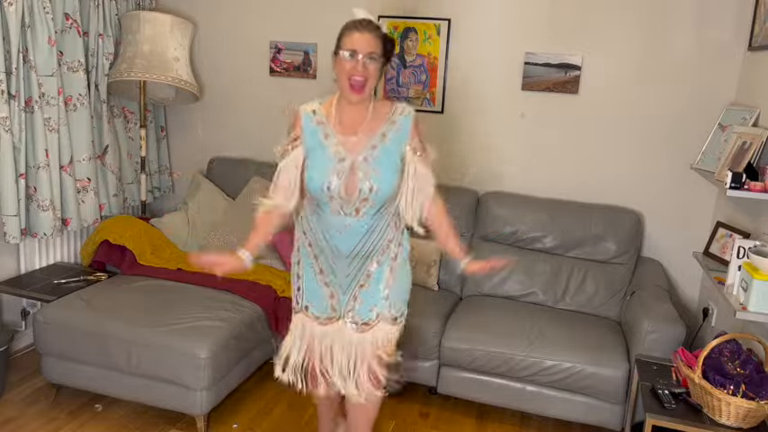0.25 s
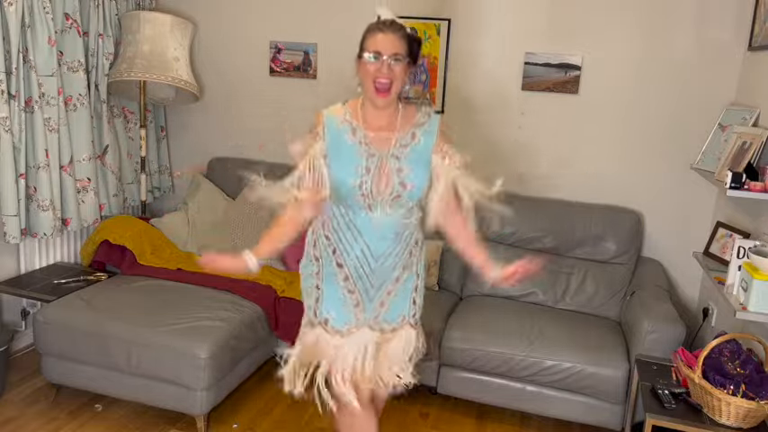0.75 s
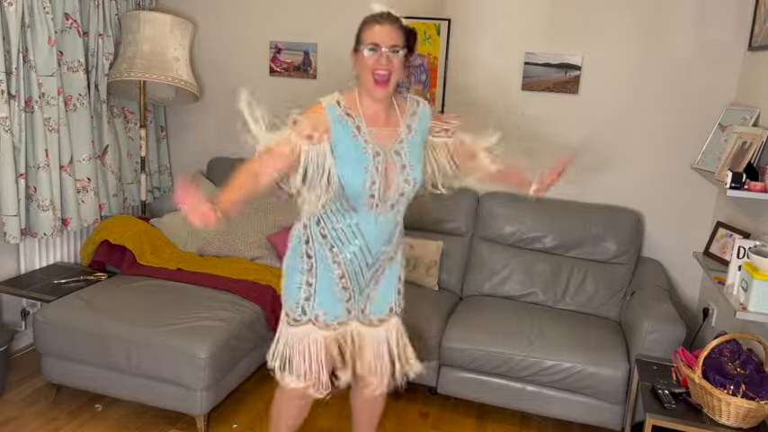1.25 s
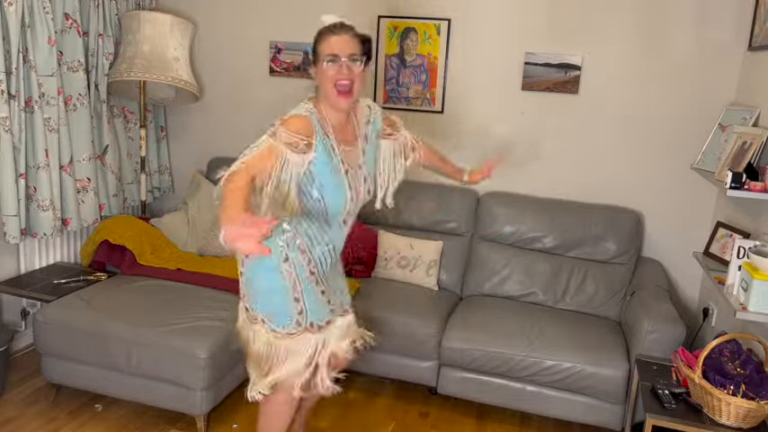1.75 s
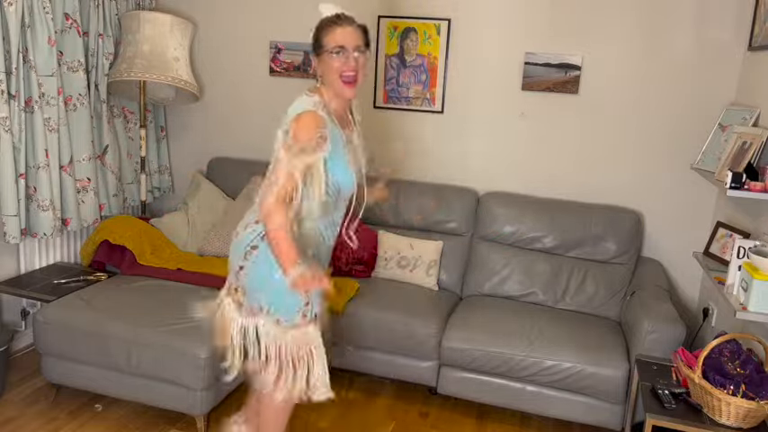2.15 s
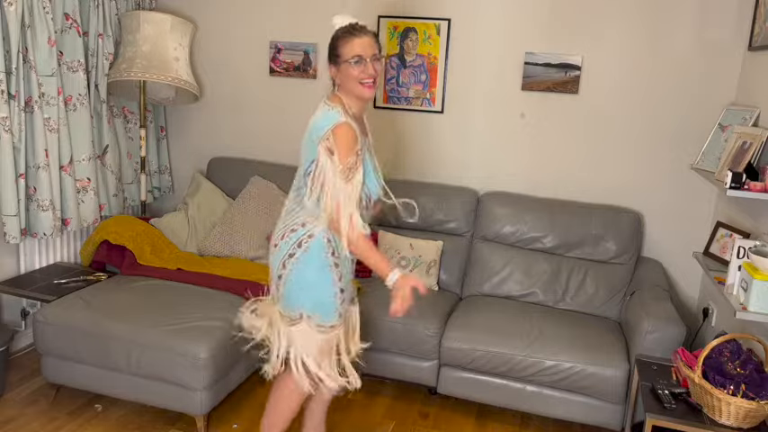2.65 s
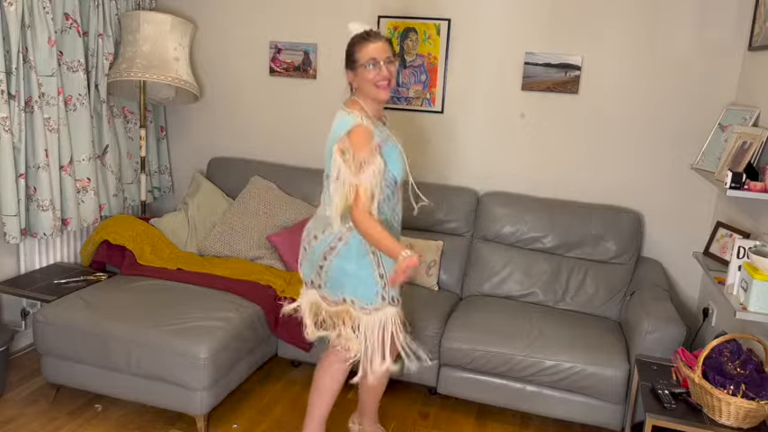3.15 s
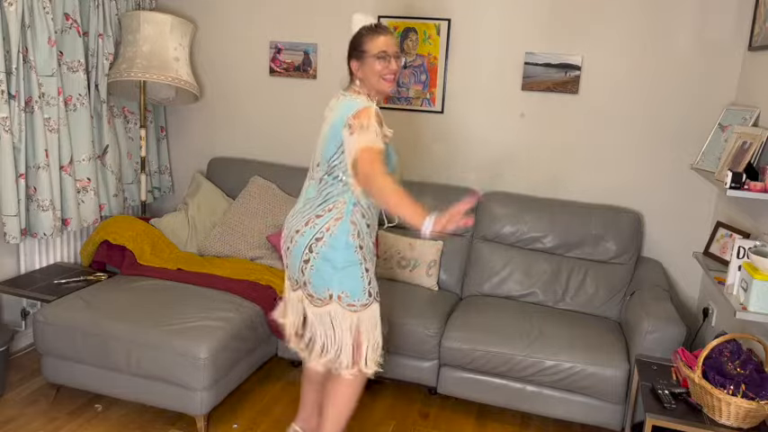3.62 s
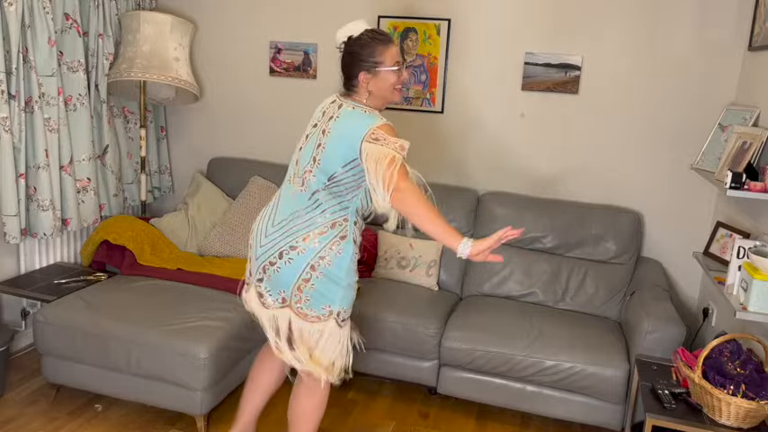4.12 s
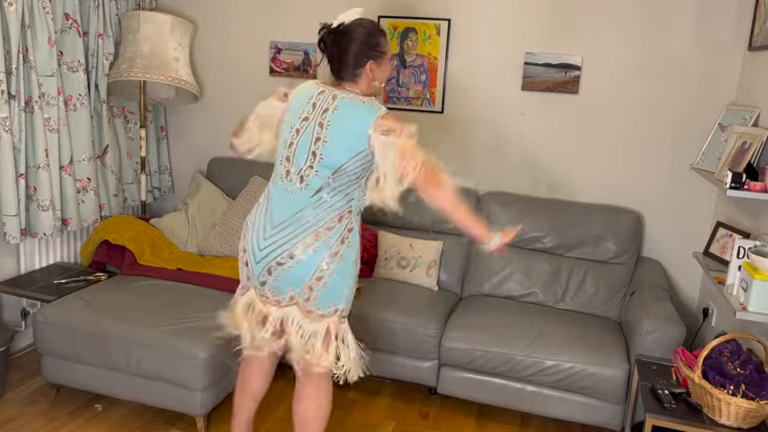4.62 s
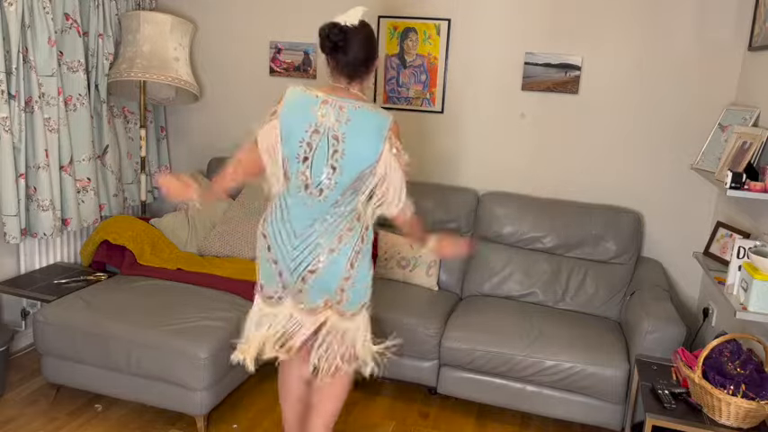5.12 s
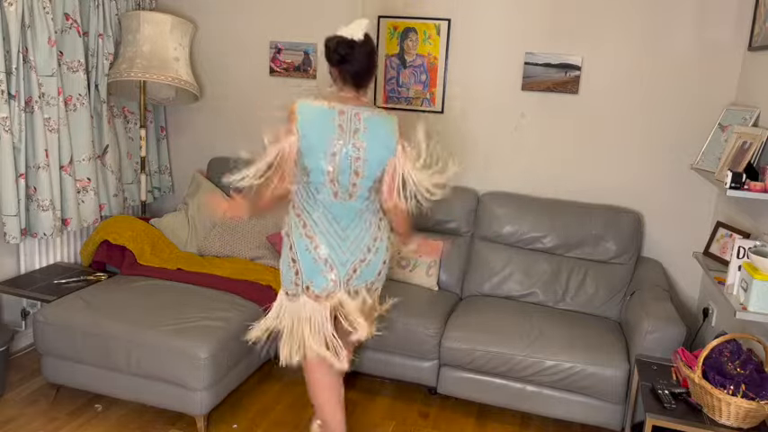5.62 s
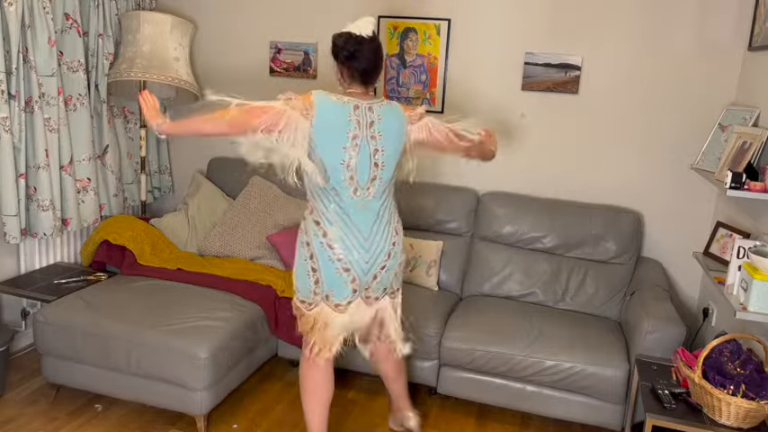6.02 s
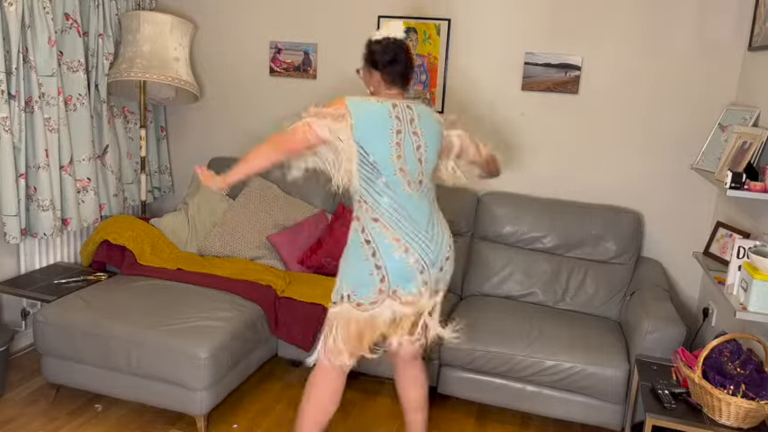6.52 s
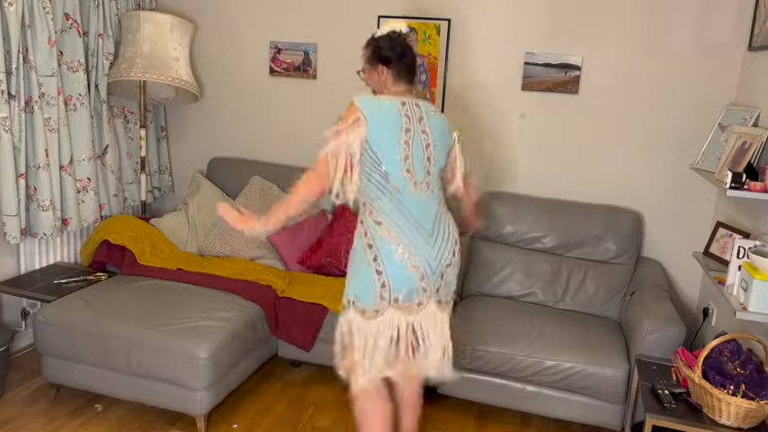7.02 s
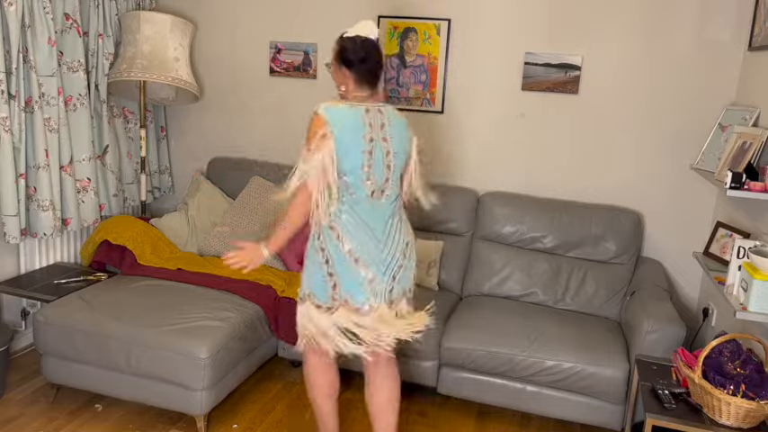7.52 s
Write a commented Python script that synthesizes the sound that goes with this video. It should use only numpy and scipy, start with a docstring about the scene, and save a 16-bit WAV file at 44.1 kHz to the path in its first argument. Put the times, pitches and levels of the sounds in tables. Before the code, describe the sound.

In a small furnished living room, one dancer's shoes thud, knock and clack on wooden boards in irregular clusters, soles rubbing between steps. The sprung floor booms low beneath heavier landings. Fringe swishes continually, beads sizzle finely, and strands slap and snap. A short squeak comes nearly halfway through, and steps crowd closer near the end. A nearby stereo microphone catches a short room ring over faint hush.

```python
"""A dancer in a beaded, fringed dress steps and swivels on a wooden floor in a small living room.
From the start there is a soft hush, soles rub the boards (noise), and shoes thud, knock and clack
(pushed resonances). The fringe swishes and beads sizzle (tiny random hits) as the joists sway and boom
(low noise and fading tones). Soon strands slap (short bright rushes of tiny hits) and hard edges snap
(short noise bursts); nearly halfway through, a sole squeaks (noise in narrow resonances)."""
import sys
import numpy as np
from scipy import signal
from scipy.fft import rfft, irfft, next_fast_len
from scipy.io import wavfile
from scipy.ndimage import uniform_filter1d, map_coordinates

SR = 44100
rng = np.random.default_rng(int(sys.argv[2]) if len(sys.argv) > 2 else 0)


def dump(signal):
    """Clip the signal to [-1, 1] and save it as 16-bit WAV at the path in sys.argv[1]."""
    limited = np.clip(np.atleast_2d(signal).T, -1, 1)
    pcm = np.round(limited * 32767).astype(np.int16)
    wavfile.write(sys.argv[1], SR, pcm)


N = 342657  # length of the scene [samples]
BLOW_TIME = np.arange(round(.3 * SR)) / SR  # the time that one blow lasts [s]


def amp(db):
    """Turn decibels into a gain."""
    return 10 ** (np.asarray(db) / 20)


def unit(x):
    """Scale a sound to rms 1."""
    return x / np.sqrt(np.mean(x ** 2) + 1e-20)


def punch(x, size=1324):
    """Scale a blow to rms 1 over its first samples."""
    return x / np.sqrt(np.mean(x[..., :size] ** 2) + 1e-20)


def along(points, hz):
    """Read a curve of (frequency, value) points on a log frequency axis."""
    f, v = np.transpose(points)
    return np.interp(np.log(hz + 1), np.log(f + 1), v)


def wobble(rate):
    """A smooth random curve with this many random points a second."""
    points = rng.standard_normal(int(N * rate / SR) + 4)
    return map_coordinates(points, [np.arange(N) * rate / SR])


def add(track, s, sound):
    """Mix a sound into a track at time s, or at the very start if s is negative."""
    part = track[:, max(round(s * SR), 0):][:, :sound.shape[-1]]
    part += sound[..., :part.shape[1]]


def filtered(x, response):
    """Change each frequency of a sound by a response function."""
    n = x.shape[-1]
    m = next_fast_len(n + 4096, True)
    return irfft(rfft(x, m) * response(np.fft.rfftfreq(m, 1 / SR)), m)[..., :n]


def coloured(x, spectrum):
    """Give a sound the shape of a spectrum, at rms 1."""
    return unit(filtered(x, lambda hz: amp(along(spectrum, hz))))


# How alike left and right are: (frequency [Hz], coherence [0 to 1])
EAR_LIKENESS = [(50, 1), (150, 0.87), (300, 0.88), (500, 0.62), (750, 0.024), (1500, 0.022), (2000, 0.57),
                (3500, 0.52), (5400, 0.32), (7000, 1), (9000, 1), (14000, 1)]


def spread(pair):
    """Mix two unrelated signals into left and right, as alike as the table says at each frequency."""
    turn = lambda hz: np.arccos(np.clip(along(EAR_LIKENESS, hz), -1, 1)) / 2
    mid, side = filtered(pair, lambda hz: np.array([np.cos(turn(hz)), np.sin(turn(hz))]))
    return np.array([mid + side, mid - side])


def noise(spectrum, size):
    """Stereo noise of rms 1 with a given spectrum."""
    return coloured(spread(rng.standard_normal((2, size))), spectrum)


# How long the room rings: (frequency [Hz], time to fall by 60 dB [s])
ROOM_RING = [(150, 0.42), (500, 0.44), (2000, 0.51), (6000, 0.61), (13000, 0.042)]


def room_tail():
    """The room's answer from one spot: noise that fades at its own speed at each frequency, energy 1."""
    hiss = rng.standard_normal((2, len(BLOW_TIME)))
    hz, t, z = signal.stft(hiss, SR, nperseg=256)
    fade = amp(-60 * t / along(ROOM_RING, hz)[:, None])
    tail = signal.istft(z * fade, SR, nperseg=256)[1][:, :len(BLOW_TIME)]
    tail = spread(tail) * (1 - np.exp(-BLOW_TIME / 0.0018))
    return tail / np.linalg.norm(tail[0])  # the left side sets the scale


def in_room(x, wet_db):
    """The direct sound plus the room's answer to it."""
    answer = signal.fftconvolve(x, room_tail(), axes=1)[:, :x.shape[1]]
    return x + amp(wet_db) * answer


def swell(s, db, rise, fall, hold=0, crest=0):
    """Power of a gesture that climbs to db at s, holds and fades; slopes in dB/s, corner rounded over crest s."""
    t = np.arange(0, N, 64) / SR - s
    away = np.maximum(-t, 0) + np.maximum(t - hold, 0)  # time outside the held part
    slope = np.abs(np.where(t < 0, rise, fall))
    return amp(db - (np.hypot(away, crest) - crest) * slope) ** 2


def envelope(swells, rest_db=-120):
    """The gain, sample by sample, of overlapping swells on top of a resting level."""
    gain = np.sqrt(sum(swells) + amp(rest_db) ** 2)
    return np.interp(np.arange(N), np.linspace(0, N, len(gain)), gain)


# Colour of the quiet room: (frequency [Hz], relative level per Hz [dB])
HUSH_COLOUR = [(20, -16), (50, 8), (110, -9.5), (300, -15), (700, -32), (1500, -10.5), (3000, -28.5),
               (7000, -23.5), (13500, -59)]


def hush():
    """The quiet of the room is steady, coloured noise."""
    return amp(-62.5) * noise(HUSH_COLOUR, N)


# A sole swivels on the boards: (start time [s], length [s], level before the wobble [dB])
SWIVEL_TIMES = [(0.0, 0.15, -49.5), (0.247, 0.18, -53.5), (0.63, .1, -57.5), (0.717, 0.091, -46.5),
                (1.34, 0.39, -55.5), (2.026, 0.13, -56), (2.37, 0.064, -58.5), (2.54, 0.4, -60),
                (3.286, 0.22, -52), (3.708, 0.077, -53.5), (4.315, 0.15, -54.5), (5.443, 0.32, -59),
                (6.197, 0.4, -55.5), (7.18, 0.78, -58.5)]
# Colour of the rubbing: (frequency [Hz], relative level per Hz [dB])
RUB_COLOUR = [(60, 5.5), (150, -1), (260, -2.5), (450, -6.5), (700, -12), (1200, -10.5), (8000, -43)]
SWIVEL_RISE_DB_PER_S, SWIVEL_FALL_DB_PER_S = 400, 168
SOLES_REST_DB = -76  # faint rubbing between swivels


def shuffle():
    """Soles rub and rock on the boards: noise with a wobbling level for as long as a foot swivels."""
    rubs = [swell(s, db, SWIVEL_RISE_DB_PER_S, SWIVEL_FALL_DB_PER_S, hold=length)
            for s, length, db in SWIVEL_TIMES]
    rocking = amp(5.0 * wobble(14))
    return envelope(rubs, SOLES_REST_DB) * rocking * noise(RUB_COLOUR, N)


def causal(x, spectrum):
    """Give a sound a spectrum that rings only after each push, never before it."""
    size = 2048
    log_gain = np.log(amp(along(spectrum, np.fft.rfftfreq(size, 1 / SR))))
    # folding the cepstrum forwards gives the minimum-phase ring
    fold = np.r_[1, np.full(size // 2 - 1, 2), np.zeros(size // 2)]
    ring = irfft(np.exp(rfft(irfft(log_gain) * fold)))
    return signal.fftconvolve(x, ring[None], axes=1)[:, :x.shape[1]]


def contact(spectrum, t60, attack, solid_db):
    """A shoe meets the wood: one solid push, then many close resonances that die together."""
    fade = amp(-60 * BLOW_TIME / t60) * (1 - np.exp(-BLOW_TIME / attack))
    pair = unit(rng.standard_normal((2, len(BLOW_TIME))) * fade)
    pair[0, 0] += amp(solid_db) * np.sqrt(len(BLOW_TIME))
    return punch(causal(spread(pair), spectrum))


def bending(x, late_cycles):
    """Bending waves in the boards: low notes travel slowest, so a knock sweeps downwards."""
    return filtered(x, lambda hz: np.exp(-2j * np.pi * late_cycles * np.log(hz + 60)))


# Ringing modes of the floor: (frequency before detuning [Hz], relative level [dB], time to fall by 60 dB [s])
BOARD_MODES = [(157.4, -6.5, 0.47), (212.7, -5, 0.375), (252.8, -4.5, 0.42), (296.2, -3, 0.18),
               (424, -11, 0.57), (466, -12, 0.15), (613, -11, 0.28), (861, -2.5, 0.087), (1098, 3.5, 0.077),
               (1307, 3, 0.03)]
SPOT_DB, SPOT_OCTAVES = 5.5, 0.043  # a mode near the spot's pitch rings louder; how near it must be


def boards(blow_db, spot_hz, roll_s):
    """The floor's modes ring as fading sines, each as hard as the blow in its range; each spot favours its own."""
    hz, mode_db, t60 = np.transpose(BOARD_MODES)[:, :, None]
    strength, detune, side = rng.standard_normal((3, len(BOARD_MODES), 1))
    # the thud drives the lowest modes, the knock the middle ones, the clack the highest
    push_db = np.interp(hz, [260, 420, 600, 850], np.repeat(blow_db, [1, 2, 1]))
    level_db = mode_db + push_db + 2 * strength
    level_db += SPOT_DB * np.exp(-(np.log2(hz / spot_hz) / SPOT_OCTAVES) ** 2)
    tones = np.sin(2 * np.pi * hz * (1 + 0.021 * detune) * BLOW_TIME)
    modes = np.sign(side) * amp(level_db - 60 * BLOW_TIME / t60) * tones
    return modes.sum(axis=0) * (1 - np.exp(-BLOW_TIME / (0.0016 + roll_s)))


# Shoe contacts, levels before trims: (time [s], thud level [dB], knock level [dB], clack level [dB],
# time to roll the foot down [s], pitch of the spot [Hz])
SHOE_STEPS = [(0.008, -50, -63, -53.5, 0.0026, 146), (0.607, -54, -76, -84, 0.0038, 208),
              (0.71, -42.5, -49.5, -74, 0.0024, 230), (0.774, -42, -49, -80, 0.0045, 140),
              (0.835, -40, -41, -47, 0.0018, 260), (0.853, -43, -46, -51, 0.0014, 129),
              (0.921, -43.5, -53, -73, 0.0035, 212), (1.263, -48.5, -63, -38.5, 0.0011, 249),
              (1.28, -43, -53, -55, 0.0034, 202), (1.897, -52, -46, -55, 0.0016, 257),
              (1.963, -42, -36.5, -45.5, 0.001, 210), (2.004, -51, -45, -53, 0.0015, 302),
              (2.489, -48, -43.5, -50, 0.001, 315), (2.522, -50, -51, -52, 0.0049, 141),
              (3.098, -42, -42.5, -51, 0.0041, 257), (3.12, -42.5, -50, -66, 0.0017, 147),
              (3.208, -41.5, -42, -51, 0.0016, 233), (3.927, -49, -54, -80, 0.0022, 154),
              (4.288, -46.5, -51, -52, 0.002, 212), (4.357, -45.5, -41.5, -49.5, 0.0011, 222),
              (4.438, -46.5, -53, -64, 0.005, 213), (4.843, -70, -78, -55.5, 0.0059, 161.0),
              (4.944, -40.5, -46.5, -57, 0.0029, 249), (5.091, -47, -40.5, -55.5, 0.00086, 266),
              (5.111, -53, -63, -47.5, 0.002, 336), (5.345, -52.5, -44.5, -54.5, 0.0016, 214),
              (5.532, -47, -48, -63, 0.0056, 435), (6.299, -52, -75, -57, 0.0013, 132),
              (6.405, -49.5, -49.5, -64, 0.0096, 238), (6.513, -46, -56, -66, 0.0042, 199),
              (6.668, -55.5, -57, -50.5, 0.0015, 250), (6.764, -44, -42.5, -51.5, 0.0009, 169),
              (6.787, -43, -61, -68, 0.0027, 283), (6.858, -44.5, -48, -59, 0.003, 324),
              (6.897, -38.5, -53, -72, 0.0033, 182), (6.981, -44, -52, -52.5, 0.004, 310),
              (7.03, -44, -67, -72, 0.0037, 193), (7.148, -49, -50, -65, 0.0065, 180),
              (7.308, -53, -62, -50.5, 0.00091, 151.0), (7.355, -45.5, -56, -53, 0.024, 211),
              (7.45, -44, -53.5, -59, 0.008, 133), (7.59, -45.5, -45, -56.5, 0.0095, 144)]
# Deep thud of the boards: (multiple of the spot's pitch, relative level per Hz [dB])
THUD_COLOUR = [(.35, -6), (.65, -13), (1, 0.5), (1.4, -10), (2.1, -19), (3.6, -31), (18, -72)]
# Hollow knock: (frequency [Hz], relative level per Hz [dB])
KNOCK_COLOUR = [(150, -7), (280, 2), (380, 8.5), (480, 3), (620, 0), (850, -2.5), (1500, -46.5),
                (8000, -73)]
# Clack of the sole: (frequency before the shift for hardness [Hz], relative level per Hz [dB])
CLACK_COLOUR = [(300, -36.5), (600, -4.5), (850, 2), (1300, 0.5), (2000, -9), (4000, -32), (8000, -50),
                (16000, -55)]
ROLL_STRETCH = 5.2  # seconds of extra ringing per second of roll
SOLID_DB, SOFTEN_DB_PER_S = 1, 1200  # first push against its ringing; loss per second of roll


def steps():
    """Each shoe thuds, knocks and clacks and rings the boards; a rolled foot blurs them all."""
    out = np.zeros((2, N))
    for s, thud_db, knock_db, clack_db, roll_s, spot_hz in SHOE_STEPS:
        bright = 2 ** ((clack_db + 51.5) * 0.073)  # a harder blow is a shorter contact
        linger = ROLL_STRETCH * roll_s
        solid_db = SOLID_DB - SOFTEN_DB_PER_S * roll_s
        thud_colour = np.multiply(THUD_COLOUR, [spot_hz, 1])
        clack_colour = np.multiply(CLACK_COLOUR, [bright, 1])
        thud = contact(thud_colour, t60=0.06 + linger, attack=roll_s, solid_db=solid_db)
        knock = contact(KNOCK_COLOUR, t60=0.084 + linger, attack=0.3 * roll_s, solid_db=solid_db)
        clack = contact(clack_colour, t60=0.059 + linger, attack=0.85 * roll_s, solid_db=solid_db)
        blow = amp(thud_db - 2.0) * punch(in_room(thud, wet_db=1.5))
        blow += amp(knock_db - 2.5) * punch(in_room(knock, wet_db=1.0))
        blow += amp(clack_db - 4.0) * punch(in_room(clack, wet_db=1.5))
        blow += amp(0.6) * boards([thud_db, knock_db, clack_db], spot_hz, roll_s)
        add(out, s, bending(blow, late_cycles=0.902))
    return out


def wandering_echoes(x):
    """The room answers from a new spot four times a second as she travels across the floor."""
    hop = SR // 4
    padded = np.pad(x, ((0, 0), (hop, 2 * hop)))
    out = np.zeros_like(padded)
    for i in range(0, N + hop, hop):
        part = padded[:, i:i + 2 * hop] * signal.windows.cosine(2 * hop)
        add(out, i / SR, signal.fftconvolve(part, room_tail(), axes=1))
    return out[:, hop:hop + N]


CLUMPS_PER_S = 420  # strands land in small uneven clumps


def patter(spectrum, rate, scatter_db, clump_db, patchy_db, wet_db):
    """Countless tiny collisions of uneven size, heard in the room; their colour shifts as the cloth moves."""
    happens = rng.random((2, N)) < rate / SR
    size = rng.standard_normal((2, N)) * amp(scatter_db * rng.standard_normal((2, N)))
    hits = happens * size * amp(clump_db * wobble(CLUMPS_PER_S))
    z = signal.stft(hits, nperseg=1024)[2]
    # random patches, smoothed over frequency and then over time
    field = uniform_filter1d(rng.standard_normal(z.shape[1:]), size=4, axis=0)
    field = uniform_filter1d(field, size=3, axis=1)
    patchy = signal.istft(z * amp(patchy_db * unit(field)), nperseg=1024)[1][:, :N]
    heard = patchy + amp(wet_db) * wandering_echoes(patchy)
    return coloured(spread(heard), spectrum)


# The fringe is thrown, levels before trims: (time of the crest [s], swish level [dB], bead sizzle level [dB],
# rise over 20 dB [s], fall over 20 dB [s])
FRINGE_SWINGS = [(0.013, -45, -61, .046, 0.14), (0.14, -49.5, -66.5, 0.086, 0.14),
                 (0.334, -48, -57.5, 0.12, 0.14), (0.635, -54.5, -64, 0.03, .25),
                 (0.741, -47, -63, 0.065, 0.093), (0.99, -50.5, -63.5, 0.26, 0.22),
                 (1.17, -80, -67, 0.036, 0.098), (1.292, -41.5, -56, 0.021, 0.15),
                 (1.624, -43.5, -59.5, 0.14, 0.13), (1.957, -50.5, -64.5, 0.097, 0.15),
                 (2.2, -48.5, -66, 0.13, 0.1), (2.526, -54, -89, 0.13, 0.13), (2.71, -51, -62, 0.053, 0.21),
                 (2.8, -54.5, -60.5, 0.12, 0.09), (2.94, -69, -66.5, 0.029, 0.15),
                 (3.132, -45.5, -58.5, 0.049, 0.16), (3.37, -46, -53.5, 0.037, 0.16),
                 (3.428, -47, -61.5, 0.029, 0.15), (3.715, -50.5, -65, 0.045, 0.14),
                 (4.019, -49, -62.5, 0.16, 0.14), (4.33, -54.5, -77, 0.18, 0.089),
                 (4.585, -47.5, -63.5, 0.077, 0.16), (4.967, -45, -58, 0.11, 0.16),
                 (5.138, -51.5, -67, 0.069, 0.14), (5.229, -78, -65, 0.13, 0.1),
                 (5.474, -56, -69, 0.34, 0.21), (5.594, -44.5, -60, 0.14, .1),
                 (5.808, -47, -58, 0.074, 0.16), (5.88, -47.5, -81, 0.089, 0.11),
                 (6.214, -47, -62.5, 0.24, 0.16), (6.41, -52.5, -65, 0.067, .15),
                 (6.47, -52, -63.5, 0.074, 0.14), (6.798, -49.5, -66.5, 0.16, 0.14),
                 (7.085, -48, -62, 0.18, 0.14), (7.384, -51, -58.5, 0.11, 0.22),
                 (7.644, -52, -65.5, 0.15, 0.3)]
# Beads and hard shoe edges snap, levels before trims: (time [s], treble level [dB], bite level [dB],
# level of the rattle that follows [dB]); the dress plays the rattle, clicks() the rest
SNAPS = [(0.2224, -55, -75, -77), (1.237, -56, -76, -73), (1.2623, -52.5, -40, -66),
         (1.467, -53.5, -52, -57), (2.1345, -59, -56, -54), (2.4309, -58, -50.5, -53.5),
         (2.989, -68, -57, -54.5), (3.102, -65, -60, -53.5), (3.6616, -68, -52, -57.5),
         (4.252, -88, -61, -55), (4.467, -58, -61, -54), (4.886, -54, -72, -82), (5.346, -69, -55, -67),
         (5.652, -48, -39, -51.5), (6.035, -80, -62.5, -73), (6.064, -66, -61, -56.5),
         (6.668, -95, -50.5, -57), (7.303, -92, -54, -61.5)]
# Colour of the swishing strands: (frequency [Hz], relative level per Hz [dB])
SWISH_COLOUR = [(120, 3.5), (300, -2), (700, 0), (1200, 3.5), (1800, -1), (2800, 0), (4300, -0.4),
                (5500, -7), (7200, -7), (10000, -27), (16000, -64)]
# Colour of the sizzling beads: (frequency [Hz], relative level per Hz [dB])
SIZZLE_COLOUR = [(2000, -40), (5000, -2), (7500, -13), (9500, 6), (12000, 2), (14100, 4), (14600, -26),
                 (15600, -43)]
SWISH_REST_DB, SIZZLE_REST_DB = -99, -75.5  # the dress is never quite still; before trims
JOLT_FALL_DB_PER_S, JOLT_SIZZLE_DB = 48.5, -10.5  # rattle's fade; its sizzle against its swish
CREST_S = 0.019  # roundness of a swing's crest


def dress():
    """Swings throw the fringe against the dress and snaps jolt it: strands swish and beads sizzle."""
    jolts = sum(swell(s, db, rise=3400, fall=JOLT_FALL_DB_PER_S) for s, _, _, db in SNAPS)
    strands, beads = [jolts], [jolts * amp(JOLT_SIZZLE_DB) ** 2]
    for s, swish_db, sizzle_db, rise_s, fall_s in FRINGE_SWINGS:
        swing = swell(s, 0, 20 / rise_s, 20 / fall_s, crest=CREST_S)
        strands.append(amp(swish_db) ** 2 * swing)
        beads.append(amp(sizzle_db) ** 2 * swing)
    swish = patter(SWISH_COLOUR, rate=9000, scatter_db=0.5, clump_db=1.0, patchy_db=2.5, wet_db=-6.0)
    swish *= envelope(strands, SWISH_REST_DB) * amp(0.91 + 1.0 * wobble(45))
    sizzle = patter(SIZZLE_COLOUR, rate=16000, scatter_db=2.5, clump_db=0.5, patchy_db=3.0, wet_db=-2.5)
    sizzle *= envelope(beads, SIZZLE_REST_DB) * amp(5.0)
    return swish + sizzle


# The body's weight lands on the floor: (nominal time of the crest [s], level before trims [dB], pitch [Hz],
# time to fall by 60 dB [s])
WEIGHT_LANDINGS = [(0.08, -47, 53.1, 0.78), (0.334, -43.5, 53.4, 0.12), (0.853, -30, 46.7, 0.39),
                   (0.949, -44, 72, 0.14), (1.081, -46.5, 50, 0.48), (1.342, -40.5, 49.5, 0.11),
                   (1.558, -44, 46.7, 0.97), (2.023, -46.5, 67.4, 0.32), (2.571, -52, 66, 0.51),
                   (3.212, -29, 53, 0.19), (4.451, -51, 68.5, 0.33), (5.063, -38, 48.1, 0.3),
                   (5.15, -48, 64, 0.14), (5.693, -43.5, 49.5, 0.46), (6.317, -34.5, 50.4, 0.15),
                   (6.921, -28, 45, 0.31), (7.041, -38.5, 75, 0.17), (7.669, -41, 50.2, 0.1)]
# Colour of the swaying floor: (frequency [Hz], relative level per Hz [dB])
SWAY_COLOUR = [(15, -52), (30, -10.5), (40, -10), (49, 8), (60, -3.5), (72, -1), (110, -28), (250, -87)]
SWAY_PER_STEP_DB, SWAY_PER_LANDING_DB = -3, -9.5  # sway against a step's thud, against a landing
SWAY_DELAY_S, SWAY_REST_DB = 0.082, -56  # the weight follows the shoe; sway at rest
SWAY_RISE_DB_PER_S, SWAY_FALL_DB_PER_S = 257, 65


def joists():
    """The sprung floor booms in a fading tone under each landing; steps and landings leave it swaying."""
    pushes = [(s + SWAY_DELAY_S, db + SWAY_PER_STEP_DB) for s, db, *_ in SHOE_STEPS]
    pushes += [(s, db + SWAY_PER_LANDING_DB) for s, db, _, _ in WEIGHT_LANDINGS]
    swells = [swell(s, db, SWAY_RISE_DB_PER_S, SWAY_FALL_DB_PER_S) for s, db in pushes]
    out = envelope(swells, SWAY_REST_DB) * noise(SWAY_COLOUR, N)
    lead = .12  # the boom starts building this long before its crest [s]
    t = np.arange(SR) / SR - lead
    for s, db, hz, t60 in WEIGHT_LANDINGS:
        build = np.exp(-(t / 0.038) ** 2)
        fade = amp(-60 * (np.hypot(t, .012) - .012) / t60)
        boom = np.where(t < 0, build, fade)
        phase = 2 * np.pi * (hz * t + rng.random())
        # a boom whose build-up would begin before the scene is pushed back to its start
        add(out, s - lead, amp(db + 6.5) * boom * np.sin(phase))
    return out


# A bunch of strands slaps the dress: (time [s], level [dB])
STRAND_SLAPS = [(0.138, -44.5), (1.003, -50), (2.145, -53), (3.135, -43.5), (3.43, -43), (4.965, -45.5),
                (5.378, -58), (5.803, -41.5), (6.22, -55)]
# Colour of a slap: (frequency [Hz], relative level per Hz [dB])
SLAP_COLOUR = [(700, -33), (1500, -7), (2500, 2.5), (4300, 0.5), (5800, -8.5), (7400, -8.5), (8500, -39)]
SLAP_RISE_DB_PER_S, SLAP_FALL_DB_PER_S = 602, 276


def slaps():
    """A bunch of strands lands all at once: a short, bright rush of tiny hits."""
    bunches = [swell(s, db, SLAP_RISE_DB_PER_S, SLAP_FALL_DB_PER_S, crest=0.004) for s, db in STRAND_SLAPS]
    rush = patter(SLAP_COLOUR, rate=5000, scatter_db=-0.5, clump_db=1.5, patchy_db=4.0, wet_db=-3)
    return envelope(bunches) * rush


def burst(spectrum, t60, attack):
    """A short contact: many close resonances that die together."""
    fade = amp(-60 * BLOW_TIME / t60) * (1 - np.exp(-BLOW_TIME / attack))
    return punch(noise(spectrum, len(BLOW_TIME)) * fade)


# Treble of a snap: (frequency [Hz], relative level per Hz [dB])
TREBLE_COLOUR = [(2000, -26), (5000, -31), (8000, 15), (11000, 1.5), (15000, -2)]
# Bite of a snap: (frequency [Hz], relative level per Hz [dB])
BITE_COLOUR = [(500, 8.5), (1200, -37), (2500, 4.5), (5000, 8), (8000, -12), (16000, -41)]


def clicks():
    """Beads and shoe edges snap sharply: two very short bursts of noise, each with its room sound."""
    out = np.zeros((2, N))
    for s, treble_db, bite_db, _ in SNAPS:
        treble = in_room(burst(TREBLE_COLOUR, t60=.03, attack=.0002), wet_db=-4)
        bite = in_room(burst(BITE_COLOUR, t60=.022, attack=.0002), wet_db=-3)
        snap = amp(treble_db + 7.5) * punch(treble, size=441)
        snap += amp(bite_db - 3.0) * punch(bite, size=441)
        add(out, s, snap)
    return out


# A sole catches as it turns: (time [s], level [dB], pitch factor on the resonances)
SOLE_CATCHES = [(3.44, -45, 0.97), (3.505, -54, 1)]
# Resonances of the squeak: (frequency before the pitch factor [Hz], width [Hz], relative level [dB])
SQUEAK_MODES = [(890, 20, -4), (1520, 17, 11), (2650, 120, -15), (4300, 100, -17)]
SQUEAK_WAVER_S = 0.0003  # the sole runs ahead and lags, so the pitch wavers
SQUEAK_RISE_DB_PER_S, SQUEAK_FALL_DB_PER_S = 904, 293


def squeak():
    """A turning sole catches and briefly scrapes: noise in a few resonances, with a wavering pitch."""
    out = np.zeros((2, N))
    clock = np.arange(N)
    waver = SQUEAK_WAVER_S * SR * wobble(55)
    for s, level_db, pitch in SOLE_CATCHES:
        ring = lambda f: sum(amp(db) * 1j * f * width / ((pitch * hz) ** 2 - f * f + 1j * f * width)
                             for hz, width, db in SQUEAK_MODES)
        scrape = unit(filtered(spread(rng.standard_normal((2, N))), ring))
        scrape = np.array([np.interp(clock + waver, clock, side) for side in scrape])
        out += envelope([swell(s, level_db, SQUEAK_RISE_DB_PER_S, SQUEAK_FALL_DB_PER_S)]) * scrape
    return out


def scene():
    """Feet, floor and dress over the hush of the room."""
    feet = shuffle() + steps() + squeak()
    cloth = dress() + slaps() + clicks()
    return hush() + feet + joists() + cloth


# Level of left against right: (frequency [Hz], left minus right [dB])
PORT_LEVELS = [(100, -1.5), (300, -0.1), (700, -3), (1400, -1), (2000, 1.5), (3000, 0), (4800, 5.5),
               (7500, 0)]
# Phase between the ports: (frequency [Hz], lead of the right port [radians])
PORT_PHASES = [(300, 0), (2000, -.2), (3000, -.8), (4800, -.5), (5800, 1), (7300, 2), (7700, 3),
               (8800, 3.3), (10000, 4.5), (12000, 6.3), (14500, 8.3)]
TOP_HZ = 15600  # nothing is kept from here up


def record(dry):
    """The two microphone ports differ in level and phase; the highest treble is cut off."""
    def ports(hz):
        """Gain and phase turn of the left and right port."""
        level = amp(np.outer([1, -1], along(PORT_LEVELS, hz)) / 2)
        return level * np.exp(1j * np.outer([-1, 1], along(PORT_PHASES, hz)) / 2)
    return filtered(dry, lambda hz: ports(hz) * (hz < TOP_HZ))


dry = scene()
out = record(dry)
dump(out)
```